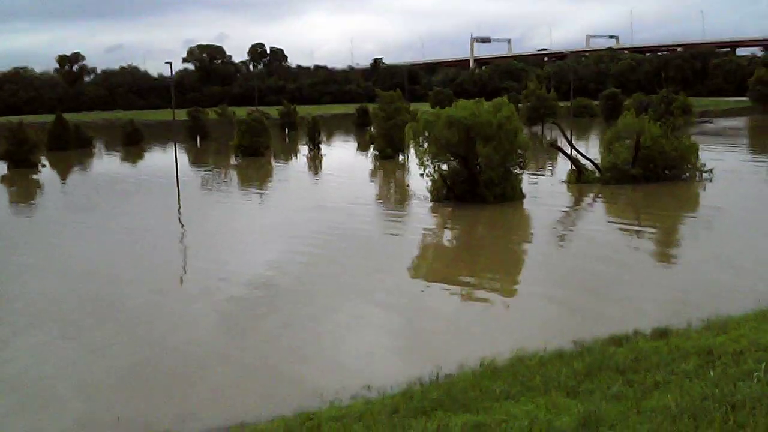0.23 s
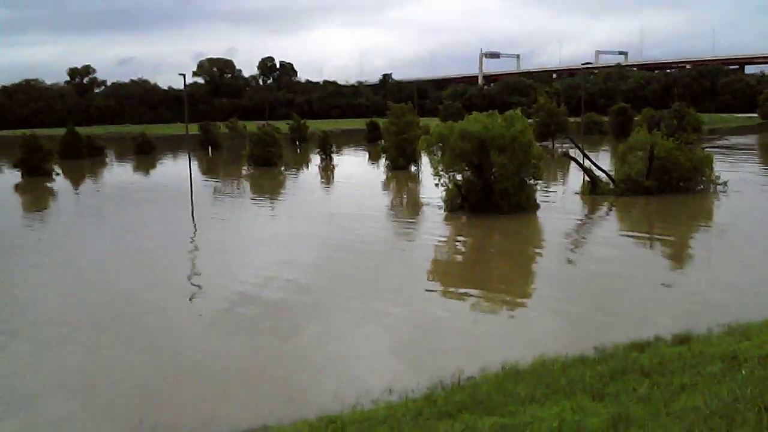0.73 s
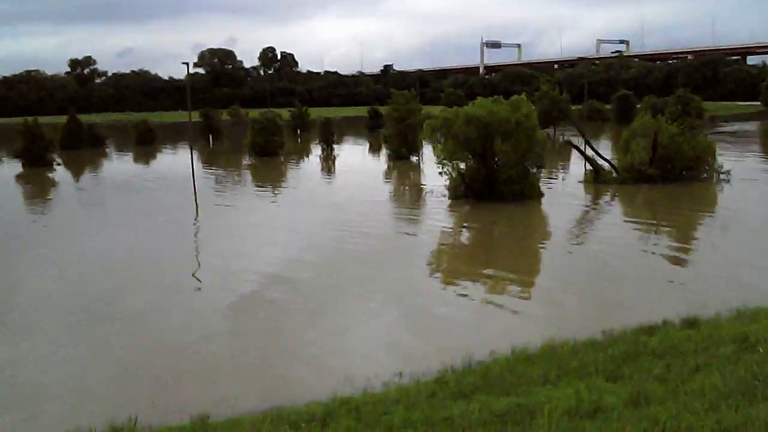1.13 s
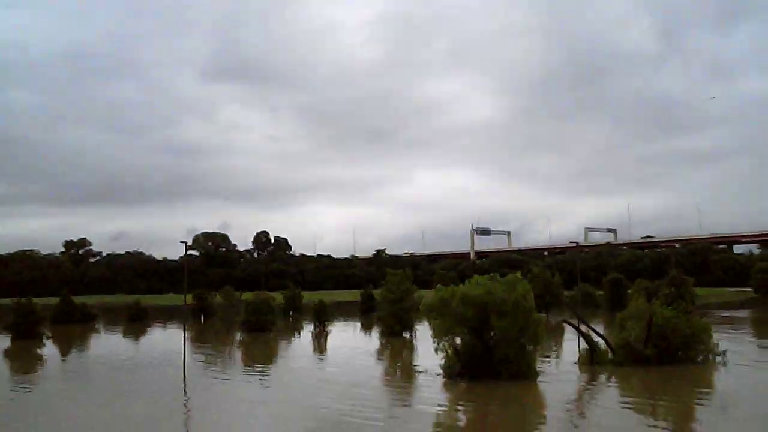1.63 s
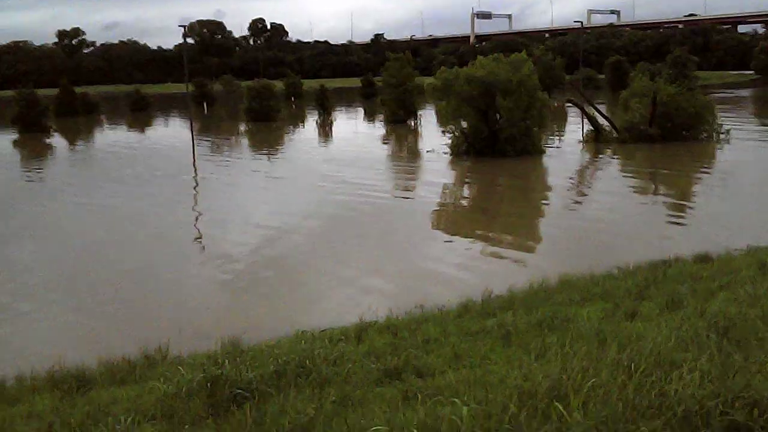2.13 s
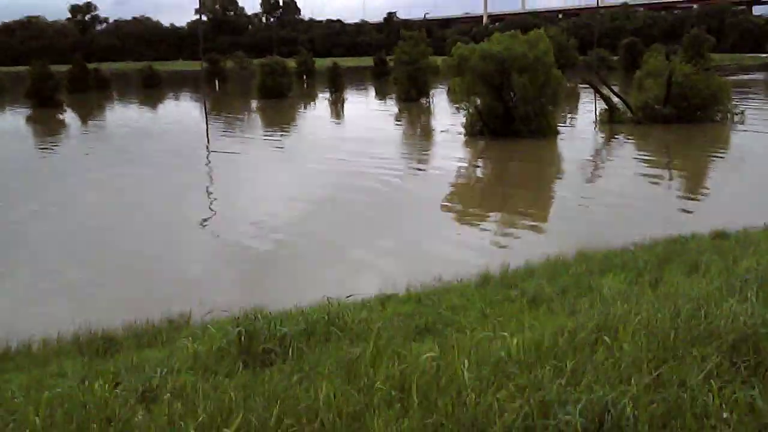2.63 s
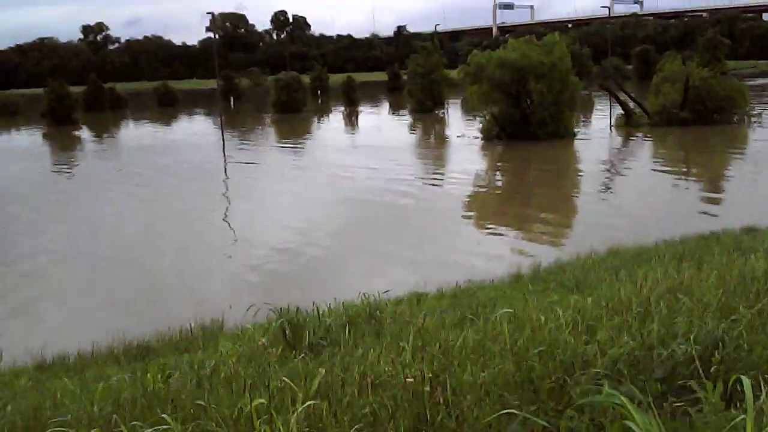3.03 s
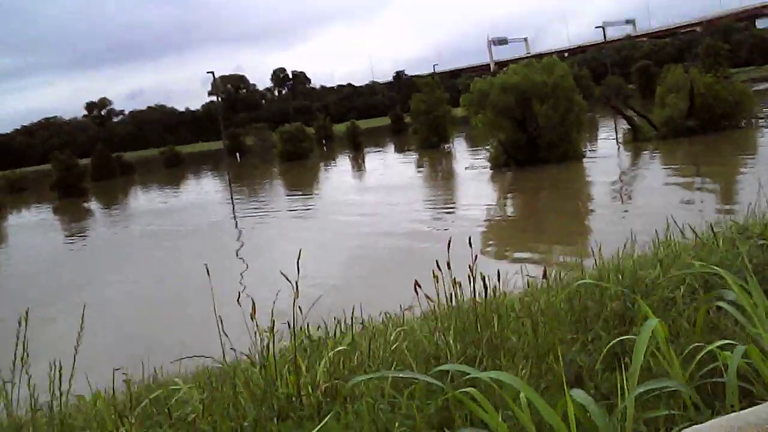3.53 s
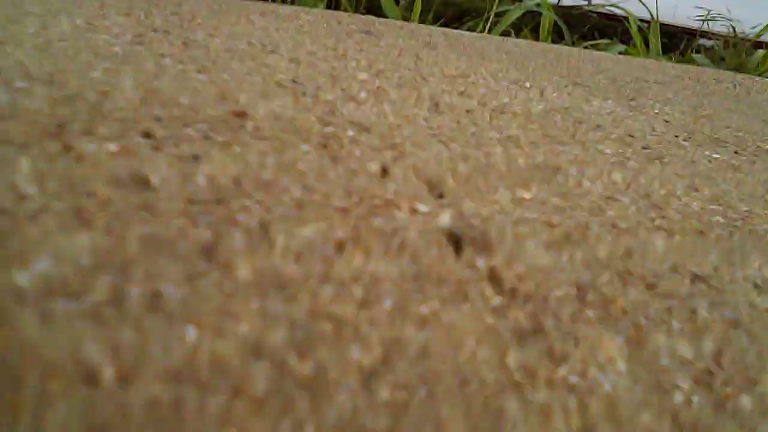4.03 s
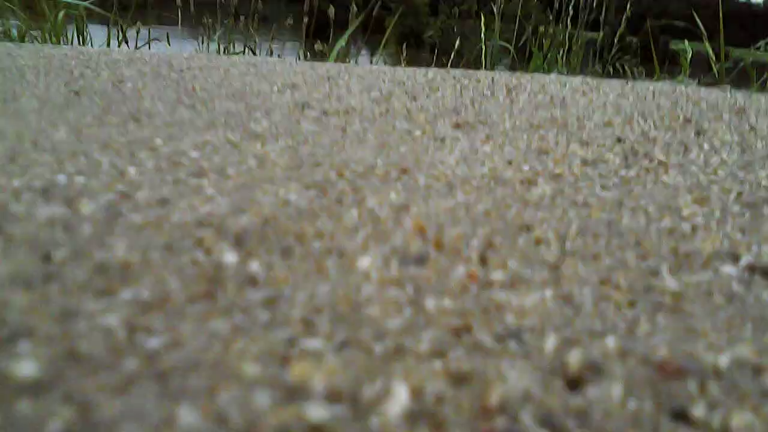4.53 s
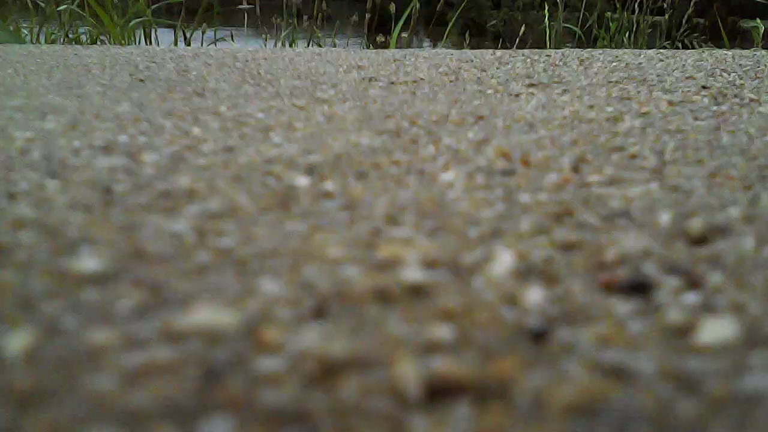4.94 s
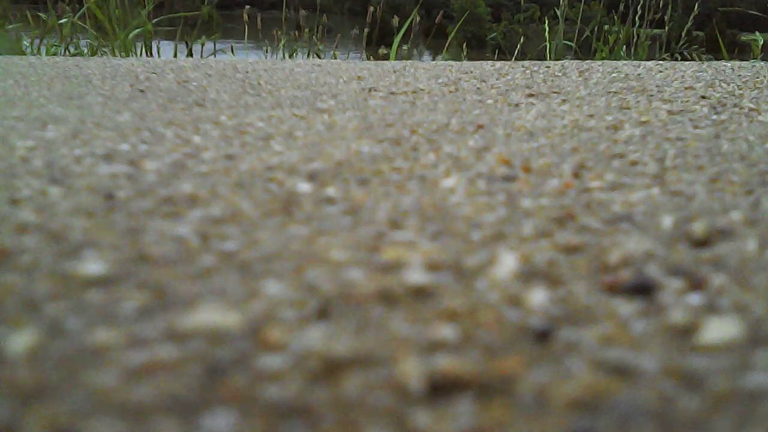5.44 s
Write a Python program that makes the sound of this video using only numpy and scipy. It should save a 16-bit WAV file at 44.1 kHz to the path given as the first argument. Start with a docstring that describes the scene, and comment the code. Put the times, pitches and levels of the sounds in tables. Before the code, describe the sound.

From the start, a small quadcopter buzzes loudly in outdoor flight, heard from a microphone on its own body. Several low blade tones beat against each other and waver in pitch, overloading the microphone into a harsh rasp. A shuddering growl, a plastic motor whirr and the rumble of propeller air sit underneath, with brief small swells. This holds until about 4 seconds, when the drone hits concrete with a thud. The buzz jumps in pitch, then drags lower and roughens as the body tumbles, with a quick string of knocks and gritty scrapes until about 4.8 seconds. The blades stall around 4.5 seconds, and a high whine slides downward, fading soon after 5 seconds. The distortion clears, and a much quieter, dulling whirr and low rumble coast down over faint hiss until the end, near 5.7 seconds.

```python
"""A small quadcopter, heard by its own camera, hums over a river bank, tumbles onto concrete and spins down.
Four blade tones beat through the shuddering frame, the motors whirr in their plastic housings,
and prop wash buffets the microphone over a faint hiss. In flight this overloads the microphone into
a rasping square wave, which comes clean only as the rotors slow. The airframe thuds and scrapes
on the ground, the blades stall, and the motors run down in a falling whine."""
import sys
import numpy as np
from scipy import signal
from scipy.fft import rfft, irfft, next_fast_len
from scipy.io import wavfile
from scipy.ndimage import map_coordinates

SR = 44100
rng = np.random.default_rng(int(sys.argv[2]) if len(sys.argv) > 2 else 0)


def unload_audio(sound):
    """Save the sound as a 16-bit wav file, at the path given as the first command line argument."""
    columns = np.transpose(np.atleast_2d(sound))
    # keep every value between -1 and 1, then stretch to whole-number steps
    steps = np.round(np.clip(columns, -1, 1) * 32767)
    wavfile.write(sys.argv[1], SR, steps.astype(np.int16))


N = 250477
TIME = np.arange(N) / SR

# The microphone's own hiss. Each row: frequency in Hz, relative level in dB.
HISS_SPECTRUM = [(100, -8.5), (3000, -2), (7000, 2), (11000, -2)]
# Air beating on the microphone. Each row: frequency in Hz, relative level in dB.
WASH_SPECTRUM = [(10, -12), (28, -4), (50, -1), (75, -1.5), (100, -5), (200, -14), (800, -58.5)]
# The colour of the plastic motor housings. Each row: frequency in Hz, relative level in dB.
HOUSING_SPECTRUM = [(200, -21.5), (500, -9), (950, -4.5), (1150, 0), (1330, -3), (1570, -3), (1900, -8),
                    (2250, -5), (2650, -13), (3200, -10.5), (3900, -20), (4700, -19.5), (6000, -37.5),
                    (11000, -44.5)]
# The vibration the light frame passes on. Each row: frequency in Hz, relative level in dB.
FRAME_SPECTRUM = [(30, -25.5), (90, -23), (135, -6), (175, -1.5), (230, -1.5), (280, -0.5), (335, -2),
                  (400, -8), (480, -15.5), (900, -29), (2000, -47.5), (5000, -76)]
# The airframe hits the concrete. Each row: start in seconds, thud level in dB, scrape level in dB.
GROUND_HITS = [(3.975, 18.5, 0), (4.185, 2, 2.5), (4.257, 8.5, 6), (4.344, 6.5, 5), (4.424, 10.5, 6.5),
               (4.512, 13.5, 4.5), (4.564, -0.5, -2), (4.66, 7, -2.5), (4.71, 9.5, -0.5), (4.747, 10, -6),
               (4.819, 4, -4.5)]
# Brief swells in the low growl, the high rotor tone and the motor whirr and whine. Each row: centre
# in seconds, width in seconds, growl and high tone boost in dB, whirr and whine boost in dB.
GROWL_AND_WHIRR_SWELLS = [(0.156, 0.033, 5.5, 4), (0.256, .05, 3.5, -1), (0.443, .04, 1.5, 2),
                          (0.545, 0.057, 6.5, -1), (0.719, 0.063, 5, -1), (1.165, 0.066, 4.5, -1.5),
                          (1.57, 0.027, 1, 4.5), (1.796, .1, 1, 5), (2.639, .03, -0.5, 4),
                          (3.001, .1, 3.5, 1), (3.399, .03, -0.5, 4), (3.539, 0.058, 5, 3),
                          (3.995, 0.035, 3, 7.5), (4.221, 0.081, 8.5, 1.5), (4.861, 0.032, 1, 6),
                          (4.951, 0.045, 4, 7), (5.062, 0.047, -2, 8), (5.177, .07, 4.5, 3),
                          (5.355, .05, 4, 0)]
# How hard the motors drive; each layer follows by its own amount. Each row: time in seconds, effort in dB.
MOTOR_EFFORT = [(0, 20.5), (1.6, 21), (3.0, 21), (4.1, 20), (4.4, 15), (4.6, 9), (4.78, 12), (4.89, -1),
                (5.06, -3), (5.23, -.5), (5.68, -6.5)]
# The pitch of a higher rotor tone. Each row: time in seconds, frequency in Hz.
HIGH_PITCH = [(0, 327.1), (.6, 308.7), (1.25, 319.8), (1.42, 345), (1.73, 360.4), (1.93, 300), (2.2, 311),
              (2.4, 300.1), (3.05, 308), (3.6, 327.9), (4.3, 334.9)]
# The pitch of a slower rotor. Each row: time in seconds, blade rate in Hz.
SLOW_PITCH = [(0, 142.9), (.5, 143.2), (.8, 157), (1.2, 156.7), (1.42, 141.3), (1.9, 155.5), (2.45, 161.8),
              (3.3, 146.7), (4.0, 150.2)]
# The pitch of the strongest rotor in flight. Each row: time in seconds, blade rate in Hz.
LEAD_PITCH = [(0.0, 211.6), (0.62, 202.6), (0.76, 213.6), (1.07, 217.2), (1.4, 205.7), (1.92, 221.6),
              (2.6, 219.0), (3.12, 209), (3.32, 208.7), (3.48, 216), (3.54, 204.9), (3.62, 205),
              (3.82, 220.8), (3.95, 216.6)]

TOUCH_S, TUMBLE_ONSET_S = 3.96, 0.2  # first ground contact; the time the tumble takes to set in
STALL_S, STALL_FADE_S, CUT_S = 4.54, 0.084, 4.82  # the blades stall, then the throttle closes
LEAD_DB, TWIN_DB, SLOW_DB, HIGH_DB = -7.5, -19, -17.5, -16  # blade tone balance, before motor effort
TWIN_GAP_HZ, TWIN_DB_PER_HZ, SLOW_DB_PER_HZ = 10, -0.77, 0.68
COAST_DB_PER_S, WHINE_FADE_DB_PER_S = 10.5, 60  # whirr and whine die away after the cut
BAND_HZ, TOP_HZ = 11100, 15800  # the camera's band edge and its hard limit


def amp(db):
    """Decibels to gain."""
    return 10 ** (np.asarray(db) / 20)


def unit(x):
    """x at rms 1."""
    return x / np.sqrt(np.mean(x ** 2) + 1e-20)


def curve(rows):
    """Automation drawn straight through (seconds, value) points."""
    return np.interp(TIME, *np.transpose(rows))


def ramp(start_s, length_s):
    """A straight rise from 0 to 1."""
    return np.clip((TIME - start_s) / length_s, 0, 1)


def swell(centre_s, width_s):
    """A bell-shaped rise and fall of height 1."""
    return np.exp(-(2 * (TIME - centre_s) / width_s) ** 2)


def wobble(rate):
    """Smooth random modulation, rate knots a second."""
    return map_coordinates(rng.standard_normal(int(N * rate / SR) + 4), [TIME * rate])


def angle(hz):
    """The running phase of a gliding pitch, from a random start."""
    return 2 * np.pi * (np.cumsum(hz) / SR + rng.random())


def filtered(x, response):
    """x through a complex frequency response."""
    size = next_fast_len(N + SR // 2)
    return irfft(rfft(x, size) * response(np.fft.rfftfreq(size, 1 / SR)), size)[:N]


def noise(spectrum):
    """Noise of rms 1 coloured by (Hz, dB) points."""
    points_hz, db = np.transpose(spectrum)
    white = rng.standard_normal(N)
    return unit(filtered(white, lambda hz: amp(np.interp(np.log(hz + 1), np.log(points_hz), db))))


def microphone_hiss():
    """The microphone's own steady noise floor."""
    return noise(HISS_SPECTRUM) * amp(-46.5)


def prop_wash(effort_db):
    """Rotor air rumbles on the microphone, with one gust thrown back by the concrete."""
    ground_gust = amp(-4) * swell(centre_s=4.69, width_s=0.35)
    return noise(WASH_SPECTRUM) * (amp(-32 + 1.19 * effort_db) + ground_gust)


def ground_bumps(push_s, scrape_s):
    """Each bump shoves the microphone once and scrapes the plastic over the grit."""
    thuds, scrapes = np.zeros(N), np.zeros(N)
    for start_s, thud_db, scrape_db in GROUND_HITS:
        age = np.maximum(TIME - start_s, 0)
        push = age / push_s
        thuds += amp(thud_db) * push * (2 - push) * np.exp(1 - push)
        scrapes += amp(scrape_db) * age / scrape_s * np.exp(1 - age / scrape_s)
    return thuds + scrapes * noise(HOUSING_SPECTRUM)


def level_swells():
    """Brief level rides in dB: one for the growl and high tone, one for the whirr and whine."""
    growl_swell_db = sum(db * swell(s, width_s) for s, width_s, db, _ in GROWL_AND_WHIRR_SWELLS)
    whirr_swell_db = sum(db * swell(s, width_s) for s, width_s, _, db in GROWL_AND_WHIRR_SWELLS)
    return growl_swell_db, whirr_swell_db


def run_down_whine(swell_db, from_hz, to_hz, midpoint_s, fall_s):
    """Four motors glide down together, each a little unsteady, and fade once the throttle closes."""
    hz = to_hz + (from_hz - to_hz) / (1 + np.exp((TIME - midpoint_s) / fall_s))
    whine = sum(np.sin(angle(hz * (1 + 0.08 * wobble(15) + 0.05 * wobble(300)))) for _ in range(4))
    fade_db = WHINE_FADE_DB_PER_S * np.maximum(TIME - CUT_S, 0)
    return unit(whine) * ramp(start_s=4.35, length_s=0.13) * amp(-11 + swell_db - fade_db)


def motor_whirr(blade_phase, effort_db, swell_db):
    """Whirr that throbs with the blades; gears rattle under load, and the sound dulls as they slow."""
    bright = noise(HOUSING_SPECTRUM)
    dull = filtered(bright, lambda hz: 1 / (1 + (hz / 2500) ** 6))
    whirr = bright + ramp(start_s=4.9, length_s=1.8) * (dull - bright)
    load = np.clip(effort_db / np.max(effort_db), 0, 1)
    throb = 1 + 0.25 * load * np.sin(blade_phase)
    rattle = amp((0.5 + 2.5 * load) * wobble(520))
    fade_db = COAST_DB_PER_S * np.maximum(TIME - CUT_S, 0)
    return whirr * throb * rattle * amp(-16.5 + 0.85 * effort_db + swell_db - fade_db)


def frame_shudder(effort_db, swell_db):
    """The motors shake the light frame into a low, restless growl."""
    return noise(FRAME_SPECTRUM) * amp(-14.5 + 1.099 * effort_db + swell_db + 0.9 * wobble(18))


def blade_tone(hz, db, tumbling, hunt, flutter_db):
    """One rotor's tone and phase; the flight controller nudges its speed by the share hunt."""
    speed = 1 + (hunt + 0.0399 * tumbling) * wobble(45)  # the tumble jolts it further
    phase = angle(hz * speed)
    flutter = flutter_db * (1 + 1.5 * tumbling) * wobble(40)
    graze_rad = 0.36 * tumbling * wobble(150)  # blades graze the ground and roughen the tone
    turning = 1 - ramp(STALL_S - STALL_FADE_S, STALL_FADE_S)
    tone = np.sqrt(2) * np.sin(phase + graze_rad)
    return tone * amp(db - 3 * tumbling + flutter) * turning, phase


def rotor_hum(effort_db, high_swell_db):
    """Four blade tones beat against each other; returns their hum and the lead blade's phase."""
    flight_hz, slow_hz, high_hz = curve(LEAD_PITCH), curve(SLOW_PITCH), curve(HIGH_PITCH)
    tumbling = ramp(TOUCH_S, TUMBLE_ONSET_S)
    # On contact the lead rotor races, then drags.
    kick = 0.19 * swell(TOUCH_S + 0.11, width_s=0.1)
    lead_hz = flight_hz * (1 + kick - 0.18 * tumbling ** 2)
    # Its twin eases off as the lead speeds up in flight.
    twin_db = TWIN_DB + TWIN_DB_PER_HZ * (flight_hz - flight_hz.mean())
    # The slow rotor swells with speed and works harder as the craft sets down.
    touchdown_db = 7.5 * swell(TOUCH_S, width_s=0.31)
    slow_db = SLOW_DB + SLOW_DB_PER_HZ * (slow_hz - slow_hz.mean()) + touchdown_db
    lead, phase = blade_tone(lead_hz, LEAD_DB, tumbling, hunt=0.00593, flutter_db=1.18)
    twin, _ = blade_tone(lead_hz + TWIN_GAP_HZ, twin_db, tumbling, hunt=0.0046, flutter_db=0.9)
    slow, _ = blade_tone(slow_hz, slow_db, tumbling, hunt=0.00759, flutter_db=3)
    high, _ = blade_tone(high_hz, HIGH_DB + high_swell_db, tumbling, hunt=0.01797, flutter_db=3)
    # In the air the lead blade adds its octave, and its unbalanced shaft thrums at a third of its rate.
    octave = np.sin(2 * phase + 1.04 * wobble(40)) * amp(-19)
    thrum = np.sin(phase / 3 + 0.69 * wobble(25)) * amp(-17.5)
    hum = lead + twin + high + slow + (octave + thrum) * (1 - tumbling)
    return hum * amp(effort_db), phase


def scene():
    """The mono mix at the airframe's microphone; hum, shudder, whirr and wash ride the motors' effort."""
    effort_db = curve(MOTOR_EFFORT)
    growl_swell_db, whirr_swell_db = level_swells()
    hum, blade_phase = rotor_hum(effort_db, growl_swell_db)
    shudder = frame_shudder(effort_db, growl_swell_db)
    whirr = motor_whirr(blade_phase, effort_db, whirr_swell_db)
    wash = prop_wash(effort_db)
    whine = run_down_whine(whirr_swell_db, from_hz=2650, to_hz=1129, midpoint_s=4.69, fall_s=0.1)
    landing = ground_bumps(push_s=0.0039, scrape_s=0.005)
    return (hum + shudder + whirr + wash + whine + landing + microphone_hiss())[None]


def overload(x, ceiling, hardness):
    """The microphone amplifier saturates; oversampling keeps the edges smooth."""
    fine = signal.resample_poly(x, 4, 1)
    flattened = fine / (1 + np.abs(fine / ceiling) ** hardness) ** (1 / hardness)
    return signal.resample_poly(flattened, 1, 4)


def record(dry):
    """The camera clips, rounds the edges with two gentle low-passes, lifts the top and limits the band."""
    clipped = overload(dry[0], ceiling=0.71, hardness=4)
    rounded = filtered(clipped, lambda hz: 1 / ((1 + 1j * hz / 1700) * (1 + 1j * hz / 3600)))
    lifted = filtered(rounded, lambda hz: 1 + 0.5 * np.exp(-((hz - 10600) / 2100) ** 2))
    # A faint high fizz remains above the band edge.
    band = lambda hz: np.maximum(1 / np.sqrt(1 + (hz / BAND_HZ) ** 60), 0.3) * (hz < TOP_HZ)
    return filtered(lifted, band)[None]


dry = scene()
out = record(dry)
unload_audio(out)
```